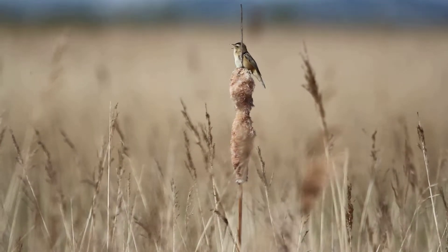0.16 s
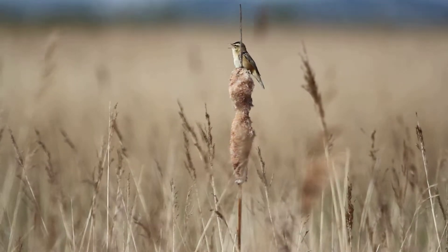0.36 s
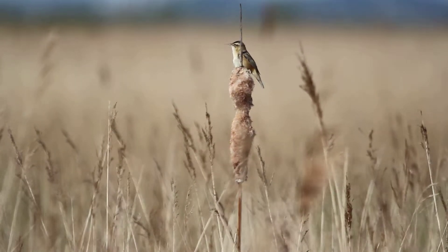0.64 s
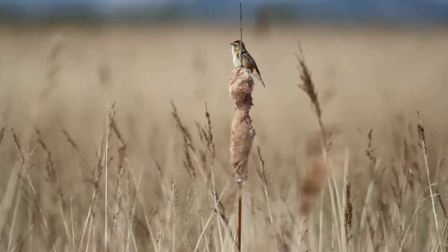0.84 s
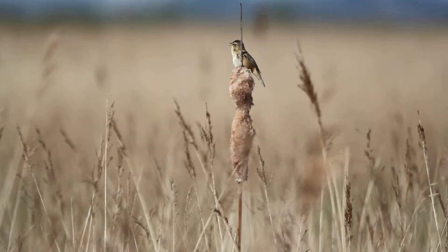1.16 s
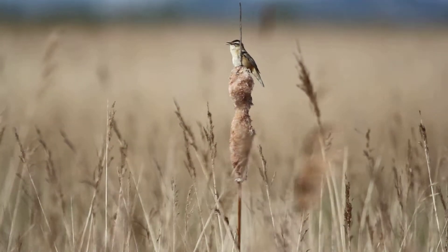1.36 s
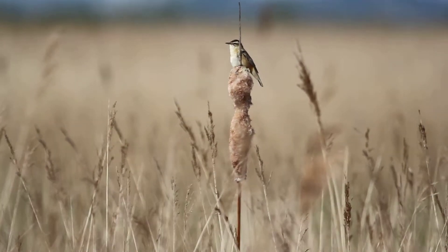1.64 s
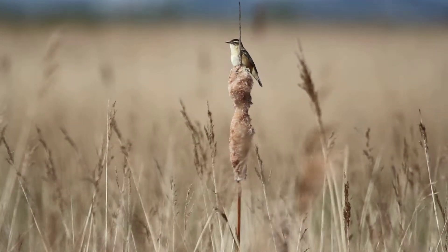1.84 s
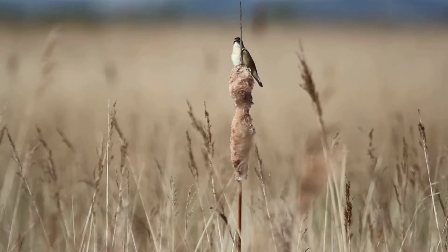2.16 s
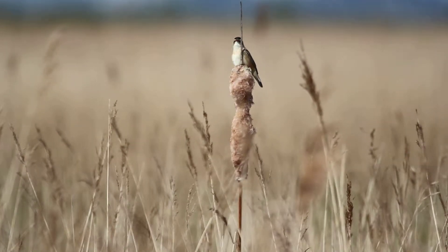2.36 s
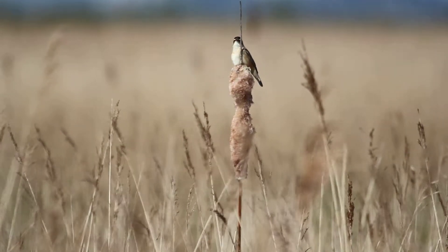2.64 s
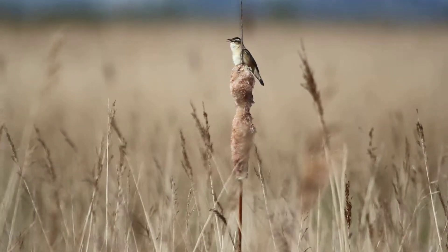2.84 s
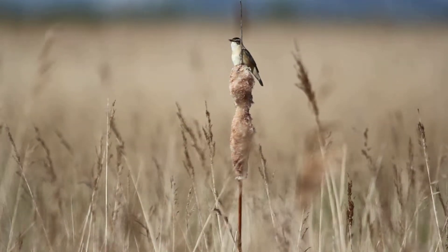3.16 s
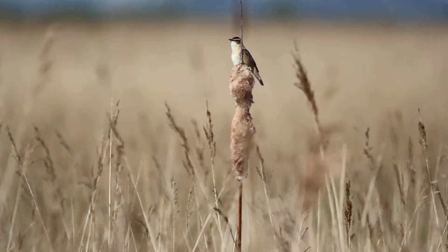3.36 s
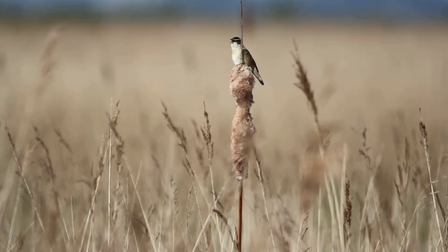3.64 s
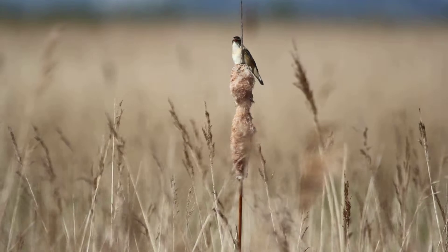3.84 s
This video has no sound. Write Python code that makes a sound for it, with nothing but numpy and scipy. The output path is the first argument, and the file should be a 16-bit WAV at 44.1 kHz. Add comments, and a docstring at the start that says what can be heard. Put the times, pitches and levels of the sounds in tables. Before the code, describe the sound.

A small songbird sings close by in an open reedbed: a quick buzz, two whistles, harsh repeated notes, two more whistles, a long harsh run, then sharp double notes; faint other birds and wind bumps on the microphone.

```python
"""In a reedbed, a small warbler sings from a reed head: a buzz, arched whistles and runs of harsh notes.
The two sides of its voice box sound together and mix; rough pulses are overtones driven by breath.
A neighbour sings in the same two-voiced way, and farther birds whistle in short glides.
Dry stems tick as tiny noise bursts, the reedbed returns the birds as a soft noise-like echo,
light wind thumps the microphone in dull lumps, and a steady shaped noise lies below."""
import sys
import numpy as np
from scipy import signal
from scipy.fft import rfft, irfft
from scipy.io import wavfile
from scipy.ndimage import uniform_filter1d

SR = 44100
rng = np.random.default_rng(int(sys.argv[2]) if len(sys.argv) > 2 else 0)


def dump_mix(stems):
    """Bounce the given channels to the path in sys.argv[1] as a 16-bit WAV at rate SR."""
    frames = np.atleast_2d(stems).T  # one column per channel
    limited = np.clip(frames, -1, 1)  # hard clip at full scale
    pcm = np.round(limited * 32767).astype(np.int16)
    wavfile.write(sys.argv[1], SR, pcm)


def decibels_to_gain(level_db):
    """Convert a level in decibels to a linear amplitude gain (20 dB per decade)."""
    exponent = np.asarray(level_db, float) / 20
    return 10 ** exponent


N = 176400   # samples: four seconds


def rms_one(x):
    """Scales a sound to an rms of 1."""
    return x / np.sqrt(np.mean(x ** 2) + 1e-20)


def at_hz(points, hz):
    """Reads a (Hz, dB) curve at any pitch, along a logarithmic pitch scale."""
    points_hz, points_db = np.transpose(points)
    return np.interp(np.log(np.maximum(hz, 1)), np.log(points_hz), points_db)


def colour(x, spectrum):
    """Shapes a sound by a (Hz, dB) curve and scales it to an rms of 1."""
    hz = np.arange(N // 2 + 1) * SR / N
    return rms_one(irfft(rfft(x) * decibels_to_gain(at_hz(spectrum, hz)), N))


def ramp(t, start, length):
    """Smooth step from 0 to 1."""
    return np.sin(np.pi / 2 * np.clip((t - start) / length, 0, 1)) ** 2


def band_pass(x, order, band_hz):
    """Lets through only the sound between two pitches."""
    return signal.sosfilt(signal.butter(order, band_hz, "band", fs=SR, output="sos"), x)


def unrest(rows, length, size):
    """Rows of noise smoothed over some samples, with an rms near 1."""
    return uniform_filter1d(rng.standard_normal((rows, length)), size=size, axis=1) * np.sqrt(size)


def add(out, start, sound):
    """Adds a sound at its start time in seconds, cut off at the end of the scene."""
    i = int(start * SR)
    out[i:i + len(sound)] += sound[:max(N - i, 0)]


def two_voices(low_hz, high_hz, high_gain, tones_db, breath_db, hiss_db):
    """Both sides of the voice box mix into sum and difference tones, shaped by the throat and air noise."""
    # mixing tones: low_count (times the low voice), high_count (times the high voice)
    mix = [(1, 0), (0, 1), (-1, 2), (2, 0), (1, 1), (0, 2), (3, 0), (2, 1), (1, 2), (4, 0)]
    # gain of throat and beak: pitch_hz, gain_db
    throat = [(1500, -26), (2400, -6.5), (3200, 4.5), (3900, 14.5), (5000, 8.5), (6500, 2.5), (10000, -17)]
    pitch_jitter, note_spread_db = 0.013, 2   # share of the pitch; tone change from note to note
    hiss_band_hz, band_share = (11900, 14700), 0.55   # share of power in treble tones, the rest is noise

    length = len(low_hz)
    wobble = unrest(3, length, 30)
    low = 2 * np.pi / SR * np.cumsum(low_hz * (1 + pitch_jitter * wobble[0]))
    high = 2 * np.pi / SR * np.cumsum(high_hz * (1 + pitch_jitter * wobble[1]))
    tones = 0
    for (m, n), db in zip(mix, tones_db):
        hz = m * low_hz + n * high_hz
        gain = decibels_to_gain(db + note_spread_db * rng.normal() + at_hz(throat, hz))
        if (m, n) != (1, 0):   # everything but the plain low voice needs the high voice
            gain = gain * high_gain
        tones = tones + gain * np.sin(m * low + n * high + rng.uniform(0, 2 * np.pi))
    first_half_rms = np.sqrt(np.mean(tones[:length // 2] ** 2))
    tones = tones * (1 + decibels_to_gain(breath_db) * wobble[2]) / first_half_rms

    # treble: further mixing tones spaced by the beat, and noise that pulses with the beat
    beat_hz = high_hz - low_hz
    beat = 2 * np.pi / SR * np.cumsum(beat_hz)
    k = np.arange(1, 21)[:, None]
    audible = low_hz + k * beat_hz < SR / 2
    bands = (np.sin(low + k * beat + rng.uniform(0, 2 * np.pi, (20, 1))) * audible).sum(axis=0)
    hiss = (1 + np.cos(beat)) * rng.standard_normal(length)
    bands = rms_one(band_pass(bands, 2, hiss_band_hz))
    hiss = rms_one(band_pass(hiss, 2, hiss_band_hz))
    treble = np.sqrt(band_share) * bands + np.sqrt(1 - band_share) * hiss
    return tones + decibels_to_gain(hiss_db) * high_gain * treble


def churr(out, start, end, hz, top_hz, db, ratio, high_top_hz, leads_s, tones_db):
    """Both voices hold, then sweep up together; the high one peaks first and fades as the low one tops out."""
    turn_s, high_turn_s = 0.014, 0.00853   # length of each voice's upward sweep
    top_hold_s, attack_s, release_s = 0.0041, 0.012, 0.005
    creep_share = 0.023   # slow climb of the held pitch

    t = start - attack_s / 2 + np.arange(int((end - start + 0.02) * SR)) / SR
    creep = 1 + creep_share * ((t - start) / (end - start - turn_s)) ** 3 - creep_share / 4
    low = hz * creep + (top_hz - hz * creep) * ramp(t, end - turn_s, turn_s + 0.00036)
    rise = np.clip((t - (end - leads_s - high_turn_s)) / high_turn_s, 0, 1.3)
    high = hz * creep * ratio + (high_top_hz - hz * ratio) * rise ** 2
    high_gain = 1 - ramp(t, end - leads_s - 0.003, 0.0052)
    shape = ramp(t, t[0], attack_s) * (1 - ramp(t, end + top_hold_s - release_s, release_s))
    voice = two_voices(low, high, high_gain, tones_db, breath_db=-13.5, hiss_db=-27)
    add(out, t[0], decibels_to_gain(db) * shape * voice)


def rasp(out, pulses, spectrum, top_hz, odd_db):
    """Each swell of breath drives rough overtones whose pitch arches with the pressure."""
    arch, jitter, breath = 0.2, 0.014, 0.6   # shares: pitch sag at the ends, pitch unrest, level unrest
    k = np.arange(1, 19)[:, None]
    for centre, length, db in pulses:
        p = np.linspace(-1, 1, int(length * SR))
        wobble = unrest(19, len(p), 40)
        hz = top_hz * (1 - arch * p ** 2) * (1 + jitter * wobble[0])
        phase = k * 2 * np.pi / SR * np.cumsum(hz) + rng.uniform(0, 2 * np.pi, (18, 1))
        gain = decibels_to_gain(at_hz(spectrum, k * hz) + odd_db * (k % 2))   # odd_db: gain of every odd overtone
        tones = gain * (1 + breath * wobble[1:]) * np.sin(phase)
        swell = np.cos(np.pi / 2 * p) ** 2
        add(out, max(centre - length / 2, 0), decibels_to_gain(db) * swell * rms_one(tones.sum(axis=0)))


def whistle(out, start, hz, gain, overtones_db):
    """A nearly pure tone follows a pitch curve, with overtones at whole multiples of its pitch."""
    phase = 2 * np.pi / SR * np.cumsum(hz)
    tone = np.sin(phase)
    for k, db in enumerate(overtones_db):
        tone = tone + decibels_to_gain(db) * np.sin((k + 2) * phase)
    add(out, start, np.sqrt(2) * gain * tone)


def harsh_notes(out):
    """The singer's runs of two-voiced notes with an upturned end."""
    # harsh notes: start_s, end_s, low_voice_hz (held), low_top_hz, level_db
    notes = [(0.844, 0.873, 2430, 3820, -37.5), (0.931, 0.963, 2434, 3830, -37),
             (1.022, 1.058, 2405, 3780, -38), (1.121, 1.153, 2337, 3830, -37.5),
             (1.203, 1.241, 2314, 3850, -37.5), (1.29, 1.331, 2380, 3710, -39),
             (1.382, 1.418, 2360, 3520, -37), (1.988, 2.018, 2440, 3860, -35),
             (2.074, 2.109, 2438, 3660, -33.5), (2.167, 2.201, 2383, 3796, -33),
             (2.27, 2.302, 2385, 3830, -33.5), (2.358, 2.397, 2338, 3840, -33),
             (2.447, 2.485, 2315, 3620, -32.5), (2.54, 2.573, 2296, 3510, -32.5),
             (2.625, 2.661, 2250, 3420, -33), (2.709, 2.747, 2207, 3400, -32),
             (2.795, 2.831, 2180, 3300, -32.5), (2.882, 2.917, 2258, 3370, -35.5),
             (2.974, 3.007, 2290, 3820, -34), (3.054, 3.095, 2367, 3730, -33)]
    # one level_db for each mixing tone, before the throat
    tones_db = [10.5, 6.5, -7, 4.5, -2, -3.5, -4.5, -6, -24, -18]
    for note in notes:
        churr(out, *note, ratio=1.333, high_top_hz=5600, leads_s=0.00496, tones_db=tones_db)


def double_notes(out):
    """A short rough pulse opens each double note; then two voices sag in pitch together."""
    # long second half of each double note: start_s, end_s, level_db
    doubles = [(3.161, 3.177, -26.5), (3.254, 3.269, -26.5), (3.36, 3.377, -28.5), (3.459, 3.478, -30),
               (3.554, 3.577, -30), (3.669, 3.689, -29), (3.765, 3.782, -28.5), (3.876, 3.89, -28)]
    # one level_db for each mixing tone, before the throat
    tones_db = [3, -4, -9, 2.5, -4, -34, -1.5, -25, -28, -18]
    # an opening pulse of its own: centre_s, length_s, level_db
    last_chip = [(3.99, .013, -29)]
    # tone colour of the opening pulses: pitch_hz, gain_db
    chip_colour = [(880, -52), (1500, -37), (2800, -26), (4310, 1.5), (6070, -4), (9140, -36.5),
                   (15500, -23)]
    chip_leads_s, chip_s, chip_db = 0.0085, 0.016, -2.5   # centre before the note; length; level against it
    low_voice_hz, ratio = 2487, 1.63   # ratio: high voice over low voice
    rise_share, rise_s = 0.1, 0.003   # each note starts this much flat and recovers
    low_sag, high_sag = 0.097, 0.069   # share of the pitch lost by the end

    chips = [(start - chip_leads_s, chip_s, db + chip_db) for start, _, db in doubles]
    rasp(out, [*last_chip, *chips], chip_colour, top_hz=855, odd_db=1.5)
    for start, end, db in doubles:
        t = start - 0.002 + np.arange(int((end - start + 0.0075) * SR)) / SR
        gone = np.clip((t - start) / (end - start), 0, 2) ** 3.3
        hz = low_voice_hz * (1 - rise_share * np.exp(-(t - t[0]) / rise_s))
        low, high = hz * (1 - low_sag * gone), hz * ratio * (1 - high_sag * gone)
        voice = two_voices(low, high, 1, tones_db, breath_db=-11.5, hiss_db=-23.5)
        shape = ramp(t, t[0], 0.0073) * (1 - ramp(t, end - 0.003, 0.0088))
        add(out, t[0], decibels_to_gain(db) * shape * voice)


def buzz(out):
    """A quick even run of nine breath pulses, and single rough pulses, two of them a faint, far buzz."""
    # rough pulses outside the run, those near 0.5 s a faint, far buzz: centre_s, length_s, level_db
    singles = [(0.018, 0.011, -36), (3.968, 0.034, -28.5), (.508, .03, -48), (.537, 0.034, -44.5)]
    # tone colour of the buzz: pitch_hz, gain_db
    buzz_colour = [(880, -42), (1500, -15.5), (2750, -11), (5290, 5), (7600, -8.5), (9790, -36.5)]
    start_s, pulses_per_s, pulse_s, level_db = 0.1445, 57.7, 0.018, -33.5
    run = [(start_s + k / pulses_per_s, pulse_s, level_db) for k in range(9)]
    rasp(out, [*singles, *run], buzz_colour, top_hz=892, odd_db=-3)


def arched_whistles(out):
    """Each whistle jumps up at its start, arches, falls ever faster and swells to its end."""
    # start_s, end_s, then guides to the pitch arch: start_hz (after the jump), top_hz, end_hz;
    # level_db (of the main tone, at the full swell)
    whistles = [(0.394, 0.477, 4500, 4990, 4280, -28.5), (.567, 0.653, 4960, 5087, 4220, -30.5),
                (1.561, 1.64, 4910, 5307, 4750, -28), (1.753, 1.834, 5110, 5390, 4890, -28)]
    # weak overtones from the second upward: level_db against the main tone
    overtones_db = [-36, -30.5]
    jump_hz, jump_s, fall_power = 2150, 0.00224, 4.96
    waver_hz, swell_db = 35, 3   # rms pitch unrest; growth over the note

    for start, end, low_hz, top_hz, end_hz, db in whistles:
        t = np.arange(0, end - start, 1 / SR)
        p = t / t[-1]
        jump = -jump_hz * np.exp(-t / jump_s)
        arch = (top_hz - low_hz) * np.sin(np.pi * p * 0.8)
        fall = (end_hz - 0.45 * low_hz - 0.59 * top_hz) * p ** fall_power
        waver = uniform_filter1d(rng.standard_normal(len(t)), size=150)
        waver = waver_hz * rms_one(uniform_filter1d(waver, size=150))
        shape = ramp(t, 0, 0.0017) * (1 - ramp(t, t[-1] - 0.005, 0.0019))
        gain = shape * decibels_to_gain(db + swell_db * (p - 1))
        whistle(out, start, low_hz + jump + arch + fall + waver, gain, overtones_db)


def warbler():
    """The singer's notes, with the faint, far buzz pulses among them."""
    out = np.zeros(N)
    buzz(out)
    double_notes(out)
    harsh_notes(out)
    arched_whistles(out)
    return out


def neighbour():
    """A second bird repeats one harsh two-voiced note, louder in its first phrase."""
    # end of each note: end_s
    ends = [0.069, 0.16, 0.251, 2.458, 2.549, 2.636, 2.723, 2.813, 2.9, 2.991, 3.661, 3.752, 3.845, 3.94]
    # level_db for each of the first four mixing tones, before the throat
    tones_db = [2.5, 8, -39, -4]
    note_s, level_db, first_phrase_db = 0.033, -45, 3.5   # first_phrase_db: added before 1 s
    out = np.zeros(N)
    for end in ends:
        db = level_db + first_phrase_db * (end < 1)
        churr(out, end - note_s, end, hz=2775, top_hz=3970, db=db, ratio=1.18, high_top_hz=4500,
              leads_s=0.00925, tones_db=tones_db)
    return out


def far_birds():
    """Single far whistles and a random chatter of short glides, each a smooth curve through three pitches."""
    # far whistles: start_s, length_s, start_hz, middle_hz, end_hz, level_db
    far_whistles = [(.31, 0.026, 4130, 3980, 3740, -63), (.375, 0.038, 2600, 2810, 2930, -67),
                    (.63, 0.083, 3700, 2680, 2700, -52.5), (.775, 0.059, 2940, 3190, 3380, -49.5),
                    (.955, 0.056, 5400, 5930, 5200, -49.5), (1.775, 0.032, 2600, 3380, 3270, -53),
                    (2.02, 0.068, 5600, 6030, 5630, -51.5), (2.095, 0.038, 4760, 4660, 4500, -47),
                    (2.225, 0.061, 4500, 5290, 5600, -48), (3.322, 0.015, 5370, 5840, 6100, -52),
                    (3.4, 0.037, 4900, 5300, 5700, -50)]
    lowest_hz, highest_hz, loudest_db = 2600, 5300, -55.5   # of the chatter's starting pitches; its level
    u = rng.random((600, 6))   # 600 glides
    hz = lowest_hz * (highest_hz / lowest_hz) ** u[:, 2]
    middle_hz, end_hz = hz * (0.92 + 0.16 * u[:, 3]), hz * (0.88 + 0.24 * u[:, 4])
    length_s = 0.005 + 0.012 * u[:, 1]
    chatter = np.c_[u[:, 0] * N / SR, length_s, hz, middle_hz, end_hz, loudest_db - 9 * u[:, 5]]
    out = np.zeros(N)
    for start, length, a_hz, b_hz, c_hz, db in [*far_whistles, *chatter]:
        p = np.arange(int(length * SR)) / (length * SR)
        glide = 2 * a_hz * (p - 0.5) * (p - 1) - 4 * b_hz * p * (p - 1) + 2 * c_hz * p * (p - 0.5)
        whistle(out, start, glide, decibels_to_gain(db) * np.sin(np.pi * p) ** 0.067, [])
    return out


def reed_echo(birds):
    """The reedbed scatters the birdsong back as a soft, fading tail of noise-like reflections."""
    echo_db, fade_60db_s = -11.5, 0.32
    t = np.arange(SR) / SR
    echo = rng.standard_normal(SR) * decibels_to_gain(-60 * t / fade_60db_s) * ramp(t, 0.0017, 0.0017)
    return decibels_to_gain(echo_db) * signal.fftconvolve(birds, echo / np.sqrt(np.sum(echo ** 2)))[:N]


def stems():
    """Each tick of a dry stem is a bright, very short burst of noise."""
    # the clear ticks: time_s, level_db (before the burst's random height and the filter)
    ticks = [(0.55, -42), (1.266, -39), (1.8602, -33), (2.1385, -36.5), (2.3412, -36), (2.707, -38),
             (3.381, -31), (3.3013, -33.5)]
    bright_hz, fade_60db_s = 8900, 0.0054
    small_per_s, small_db = 73, -50.5   # small ticks at random, 3 dB spread
    clicks = (rng.random(N) < small_per_s / SR) * decibels_to_gain(small_db + 3 * rng.standard_normal(N))
    for s, db in ticks:
        clicks[int(s * SR)] = decibels_to_gain(db)
    fading = signal.lfilter([1], [1, -decibels_to_gain(-60 / (fade_60db_s * SR))], clicks + 1e-18)
    burst = fading * rng.standard_normal(N)
    return signal.sosfilt(signal.butter(1, bright_hz, "high", fs=SR, output="sos"), burst)


def wind():
    """Eddies thump the microphone as dull lumps that follow the gusts."""
    # buffets of wind: time_s, level_db
    gusts = [(.29, -41.5), (0.786, -25), (0.807, -24.5), (0.929, -35.5), (1.02, -35), (1.134, -39),
             (1.158, -29), (1.669, -30), (2.25, -37.5), (2.65, -39.5), (3.564, -24), (3.598, -27),
             (3.652, -27), (3.72, -29), (3.757, -17.5), (3.801, -23), (3.836, -27.5), (3.875, -48),
             (3.901, -20.5), (3.928, -22.5)]
    gust_s, flutter_db = 0.017, -61   # time for a gust to fall to 1/e; steady flutter below the gusts
    lumps_per_s, lump_spread_db, lump_hz = 200, 4, (56.6, 214.3)
    lumps = (rng.random(N) < lumps_per_s / SR) * decibels_to_gain(lump_spread_db * rng.exponential(1, N))
    lumps = lumps * rng.choice([-1, 1], N)
    dull = band_pass(lumps + 1e-18, 3, lump_hz)
    # even out the lumps, so that the gusts set the level
    dull = dull / np.sqrt(uniform_filter1d(dull ** 2, size=900) + 0.074 * np.mean(dull ** 2))
    t = np.arange(N) / SR
    level = decibels_to_gain(flutter_db) + sum(decibels_to_gain(db) * np.exp(-((t - s) / gust_s) ** 2) for s, db in gusts)
    return level * rms_one(dull)


def air():
    """Steady background noise, strongest in the bass."""
    # its tone colour: pitch_hz, gain_db
    air_colour = [(12, -43), (20, -6.5), (81, 5), (186, -4.5), (239, -10), (467, -5.5), (2170, -25.5),
                  (4870, -22.5), (5750, -27.5), (15700, -42.5)]
    return decibels_to_gain(-43.5) * colour(rng.standard_normal(N), air_colour)


def scene():
    """Adds up the birds, their echo and the background, as one channel."""
    birds = warbler() + neighbour() + far_birds()
    return (birds + reed_echo(birds) + stems() + wind() + air())[None]


def low_pass(x):
    """Removes everything above the highest recorded frequency."""
    return signal.sosfilt(signal.butter(12, 15850, fs=SR, output="sos"), x)


def record(dry):
    """A steep filter cuts the top above 15950 Hz."""
    mix = signal.sosfilt(signal.cheby2(24, 50, 15950, fs=SR, output="sos"), dry)
    return low_pass(mix)


dry = scene()
out = record(dry)
dump_mix(out)
```